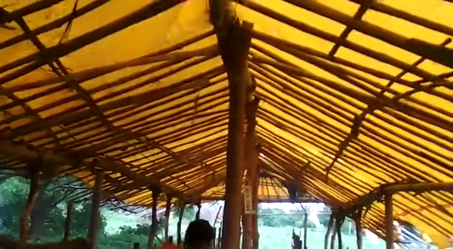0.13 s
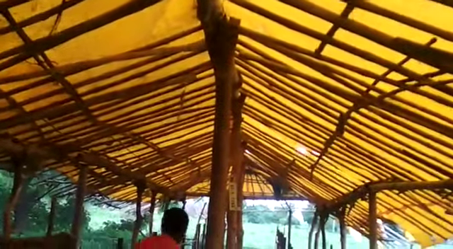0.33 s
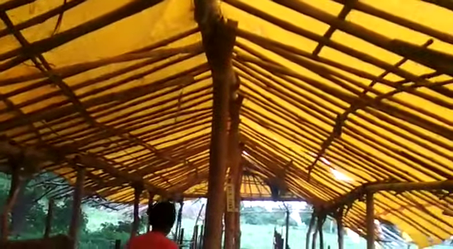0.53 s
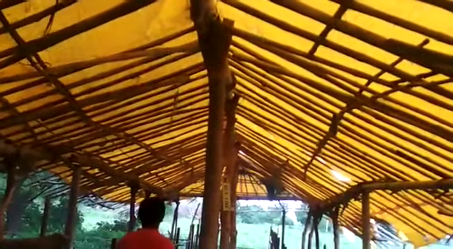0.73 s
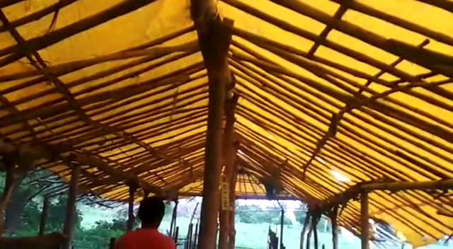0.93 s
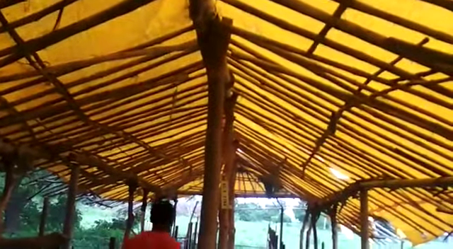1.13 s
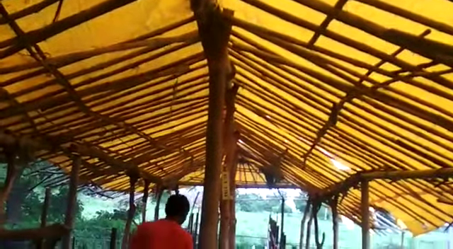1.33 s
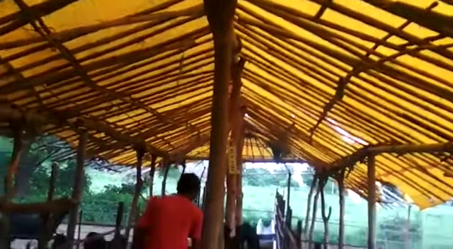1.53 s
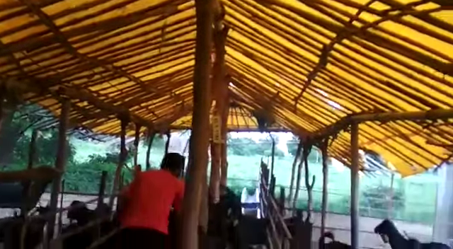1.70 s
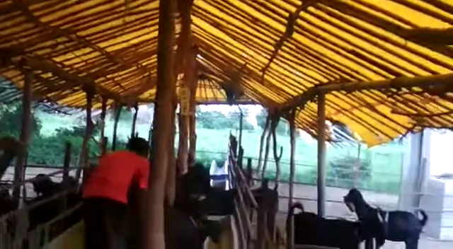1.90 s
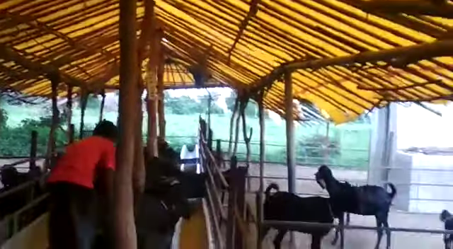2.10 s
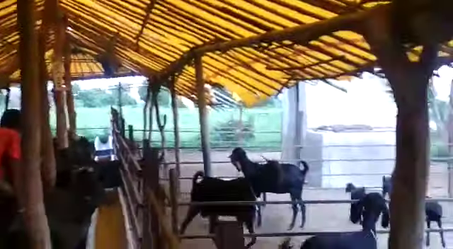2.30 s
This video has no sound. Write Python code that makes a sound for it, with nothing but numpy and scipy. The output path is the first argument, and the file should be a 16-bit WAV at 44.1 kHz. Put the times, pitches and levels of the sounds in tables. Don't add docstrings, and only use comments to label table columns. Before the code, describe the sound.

Wooden bangs from hooves and horns come at once, clustered at 0-0.4 s, with woody thuds and bright cracks. A lull at 0.45-0.8 s holds soft straw scuffs and ticks. Knocks return at 0.83 and 1.13-1.2 s. A far, thin, quavering kid bleat runs 1.42-1.88 s, ending with a tiny squeak. Hard bangs follow at 2.03-2.1 s, then fade. Wind rumbles on the right; the herd shuffles faintly.

```python
import sys
import numpy as np
from scipy import signal
from scipy.fft import rfft, irfft, next_fast_len
from scipy.io import wavfile
from scipy.ndimage import uniform_filter1d, map_coordinates

SR = 44100
rng = np.random.default_rng(int(sys.argv[2]) if len(sys.argv) > 2 else 0)


def transcribe(u):
    v = np.clip(np.atleast_2d(u).T, -1, 1)
    q = np.round(v * 32767).astype(np.int16)
    wavfile.write(sys.argv[1], SR, q)


def undo_db(level):
    steps = np.asarray(level, float) / 20
    return 10 ** steps


N = 108133
TIME = np.arange(N) / SR


def unit(x):
    return x / np.sqrt(np.mean(x ** 2) + 1e-20)


def along(points, hz):
    f, v = np.transpose(points)
    return np.interp(np.log(hz + 1), np.log(f + 1), v)


def coloured(points):
    return lambda hz: undo_db(along(points, hz))


def wobble(rate_hz):
    return map_coordinates(rng.standard_normal(int(N * 400 / SR)), [TIME * rate_hz])


def filtered(x, response):
    m = next_fast_len(N + 8192)
    return irfft(rfft(x, m) * response(np.fft.rfftfreq(m, 1 / SR)), m)[..., :N]


def resonances(peaks):
    def response(f):
        total = 0
        for k, (centre, spread, db) in enumerate(peaks):
            ring = 1j * f * spread / (centre ** 2 - f ** 2 + 1j * f * spread)
            total = total + (-1) ** k * undo_db(db) * ring
        return total
    return response


def rush(response):
    # pitch_hz, likeness (0 to 1)
    likeness = [(60, 0.61), (180, 1), (550, 0.85), (1650, 0.074), (4970, 0.0), (15000, 0.21)]
    # pitch_hz, level_db
    lean = [(180, 0.5), (550, -1.5), (1400, 4), (2600, -1.5), (6000, 0.5), (14000, 0.5)]
    left_lag_s = 4e-5

    def spread(hz):
        turn = np.arccos(np.clip(along(likeness, hz), -1, 1)) / 2
        return response(hz) * np.array([np.cos(turn), np.sin(turn)])

    def ports(hz):
        balance = undo_db(np.outer([.5, -.5], along(lean, hz)))
        return balance * np.exp(np.outer([-1j, 1j], np.pi * hz * left_lag_s))

    mid, side = filtered(rng.standard_normal((2, N)), spread)
    return unit(filtered(np.array([mid + side, mid - side]), ports))


def blow(s, t60, rise_s):
    t = np.maximum(TIME - s, 0)
    sag_db_per_s2 = 679
    return (1 - np.exp(-t / rise_s)) * undo_db(-60 * t / t60 - sag_db_per_s2 * t * t)


def patchy(x):
    z = signal.stft(x, nperseg=256)[2]
    patches = rng.standard_normal(z.shape[1:])
    patches = uniform_filter1d(patches, size=3, axis=0)
    patches = uniform_filter1d(patches, size=8, axis=1)
    patch_db = 2.5 * unit(patches)
    return unit(signal.istft(z * undo_db(patch_db), nperseg=256)[1][:, :N])


def yard():
    # time_s, level_db
    yard_swell = [(0, -59.5), (.45, -69.5), (.55, -72), (.75, -68), (1.05, -69), (1.3, -60), (1.41, -69),
                  (1.45, -74), (1.85, -82), (1.98, -71), (2.3, -64), (2.45, -71.5)]
    # pitch_hz, level_db
    yard_colour = [(2500, -33), (5000, -6.5), (7500, -4.5), (8400, -10), (10000, -6.5), (15500, 1)]
    return undo_db(np.interp(TIME, *np.transpose(yard_swell))) * rush(coloured(yard_colour))


def herd():
    # time_s, level_db
    shuffling = [(0, -73), (.45, -67), (.7, -62), (.8, -67), (1.08, -67.5), (1.3, -64.5), (1.42, -67.5),
                 (1.68, -66), (1.95, -56.5), (2.3, -62.5), (2.45, -66.5)]
    # pitch_hz, level_db (per Hz)
    air_colour = [(100, -14.5), (200, -21.5), (340, -25), (1400, -27), (2000, -30.5), (4500, -38.5),
                  (7500, -46.5), (8400, -49)]
    return undo_db(np.interp(TIME, *np.transpose(shuffling)) + wobble(11.3)) * rush(coloured(air_colour))


def wind():
    # time_s, level_db
    gusts = [(0, -40), (.07, -41.5), (.13, -38.5), (0.298, -44.5), (.6, -57), (0.631, -43.5), (0.779, -59),
             (0.818, -43), (0.989, -42), (1.082, -59), (1.242, -63), (1.271, -42), (1.38, -66), (1.69, -72),
             (1.73, -42.5), (1.84, -41), (1.98, -46.5), (2.24, -41), (2.324, -55)]
    # pitch_hz, level_db (per Hz)
    rumble = [(9, -23), (15, 9.5), (38, -2.5), (97, -10.5), (140, -16), (200, -22.5), (300, -35.5),
              (600, -100)]
    # time_s, pressure_db, sign_and_size (no unit), width_s
    slaps = [
        (0.031, -18.5, -1.26, 0.0057),
        (0.207, -26, 1, 0.0071),
        (0.966, -10, -0.39, 0.0065),
        (1.913, -13.5, 0.81, 0.0034),
        (0.639, -31, -1.1, 0.0071),
        (1.746, -26, 1, 0.0053),
        (1.762, -18, 0.41, 0.0053),
        (2.201, -29, 0.67, 0.014),
    ]
    puffs_s = [.22, .43, .76, 1.0, 1.23, 1.345, 1.42, 1.53, 1.585, 1.88, 2.0, 2.26, 2.39]
    puff_width_s = 0.0077
    lee, face = filtered(rng.standard_normal((2, N)), coloured(rumble))
    gust_db = np.interp(TIME, *np.transpose(gusts)) + 6.5
    face = unit(face * undo_db(1.5 * wobble(12.02))) * undo_db(gust_db)
    puffs = sum(np.exp(-((TIME - at) / puff_width_s) ** 2) for at in puffs_s)
    lee = unit(lee * (0.14 + puffs)) * undo_db(-57)
    slap = np.zeros(N)
    for s, db, sign, width_s in slaps:
        u = (TIME - s) / width_s
        slap += sign * undo_db(db) * (1 - .5 * u) * np.exp(-u * u)
    return np.array([lee, face + filtered(slap, lambda f: 1j * f / (18 + 1j * f))])


def straw():
    # start_s, length_s, level_db
    scuffs = [
        (0.483, 0.11, -65.5),
        (0.513, 0.3, -65),
        (0.995, 0.093, -70.5),
        (1.681, 0.25, -88),
    ]
    # pitch_hz, level_db
    straw_colour = [(2000, -11), (3500, 1.5), (5500, 5), (7500, 5.5), (8300, 3.5), (10000, 0), (12000, -6),
                    (16000, -25)]
    stroke = np.zeros(N)
    for s, length_s, db in scuffs:
        stroke += undo_db(db) * np.sin(np.pi * np.clip((TIME - s) / length_s, 0, 1)) ** 1.2
    grain_db = 1.5 * wobble(25) + 2.5 * wobble(250)
    return stroke * undo_db(grain_db) * rush(coloured(straw_colour))


def closing_squeak():
    # start_s, length_s, from_hz, to_hz, level_db
    squeak = (1.842, .056, 1570, 1390, -50)
    s, length_s, from_hz, to_hz, db = squeak
    u = np.clip((TIME - s) / length_s, 0, 1)
    turns = np.cumsum(from_hz + (to_hz - from_hz) * u) / SR
    return undo_db(db) * np.sin(np.pi * u) * np.sin(2 * np.pi * turns)


def rasp():
    # pitch_hz, level_db
    nose_colour = [(8800, -45), (9500, 2), (11900, 4), (12200, -53.5), (16000, -55)]
    nose_s = (1.42, 1.45, 1.9, 2.0)
    # pitch_hz, level_db
    wheeze_colour = [(5200, -42), (6300, -5), (7600, -7), (9200, -8), (9800, -30)]
    wheeze_s = (1.45, 1.52, 1.77, 1.81)
    nose_db = -65 + np.interp(TIME, nose_s, [-2, -1, 0.5, -14], -60, -60) + 1.3 * wobble(30.8)
    wheeze_db = -65.5 + np.interp(TIME, wheeze_s, [-17, 4, -3, -35], -60, -60) + 2.5 * wobble(24.5)
    return undo_db(nose_db) * rush(coloured(nose_colour)) + undo_db(wheeze_db) * rush(coloured(wheeze_colour))


def kid():
    # time_s, pitch_hz, level_db
    bleat = [
        (1.422, 522, -82),
        (1.44, 524, -67),
        (1.52, 535, -63),
        (1.6, 548, -63),
        (1.65, 564, -62),
        (1.75, 572, -61),
        (1.815, 572, -63),
        (1.84, 535, -68),
        (1.88, 490, -84),
    ]
    # pitch_hz, width_hz, level_db
    throat = [(545, 250, -26), (1140, 140, -2), (1680, 180, 2), (6950, 500, 9)]
    # pitch_hz, width_hz, level_db
    mouth = [(4870, 520, -26)]
    mouth_opens_s = (1.55, 1.62)
    s, hz, db = np.transpose(bleat)
    tremble_from_s, tremble_hz = 1.448, 11.7
    since = np.maximum(TIME - tremble_from_s, 0)
    shake = np.cos(2 * np.pi * tremble_hz * (TIME - tremble_from_s))
    quaver = 0.04 * np.exp(-since / 0.25) * shake
    jitter = 0.004 * (wobble(25) + wobble(110))
    turns = np.cumsum(np.interp(TIME, s, hz) * (1 + quaver + jitter)) / SR
    pulses = np.zeros(N)
    for k in range(1, 22):
        pulses += undo_db((2 + .15 * k) * wobble(22)) * np.cos(2 * np.pi * k * turns)
    breath = unit((1 + np.cos(2 * np.pi * turns)) * rng.standard_normal(N))
    folds = 0.85 * unit(pulses) + 0.15 * breath
    opening = np.interp(TIME, mouth_opens_s, [0, 1])
    voice = unit(filtered(folds, resonances(throat)) + filtered(folds * opening, resonances(mouth)))
    voice = voice * undo_db(np.interp(TIME, s, db, -120, -120) + 3 * shake)
    tail = rng.standard_normal((2, SR // 5)) * undo_db(-60 * TIME[:SR // 5] / 0.3)
    echo = signal.fftconvolve(voice[None], tail / np.linalg.norm(tail[0]), axes=1)[:, :N]
    return 1.3 * voice + 0.95 * echo


def ticks():
    # time_s, level_db, fade_s (by 60 dB), left_over_right_db, lowest_hz, highest_hz
    snaps = [(0.417, -66.5, 0.091, 29, 11900, 16200), (.486, -66.5, 0.05, 12, 5500, 9000),
             (.503, -62.5, 0.13, 3, 10000, 15500), (.577, -62, .06, 11, 3300, 4800),
             (0.947, -44, 0.22, -0.5, 3030, 11900), (1.592, -59, 0.069, 0.5, 8000, 12000),
             (1.735, -55, .08, 0.5, 7000, 12000), (2.297, -66.5, 0.13, -20, 11800, 15700),
             (0.017, -44.5, 0.073, 4, 2200, 15200), (0.838, -34, 0.061, 1, 3000, 16000),
             (2.099, -31.5, .08, 0, 4960, 15300)]
    total = np.zeros((2, N))
    for s, db, t60, side_db, low_hz, high_hz in snaps:
        noise = rush(lambda f: (f / low_hz) ** 8 / (1 + (f / low_hz) ** 8) / (1 + (f / high_hz) ** 8))
        sides = undo_db(db + np.array([[side_db / 2], [-side_db / 2]]))
        total += sides * blow(s, t60, 0.00067) * noise
    return total


def thuds():
    contacts_s = [.011, .015, .179, .356, .538, .89, 1.19, 1.884, 2.028, 2.104, 2.18, 2.272, 2.392, .5,
                  1.752, 1.8, .836, .19, .262]
    # level_db, pitch_hz, fade_s (by 60 dB)
    boards = [(-43.5, 188.5, 0.48), (-33, 1630, 0.13), (-37, 380, 0.29), (-34.5, 1200, 0.15),
              (-50.5, 267, 0.17), (-40, 424, 0.26), (-38, 344, 0.46), (-49.5, 420, 0.083),
              (-37.5, 177, 0.29), (-30, 360, 0.38), (-42, 250, 0.35), (-50, 440, 0.28), (-46, 180, 0.22),
              (-60, 1260, 1), (-50.5, 1270, 0.13), (-60, 1260, 0.076), (-34, 1240, 0.26), (-40, 420, 0.18),
              (-43, 1600, 0.14)]
    shake = rush(np.ones_like)
    total = np.zeros((2, N))
    for s, (db, hz, t60) in zip(contacts_s, boards):
        board = resonances([(hz, .45 * hz, 0)])
        ringing = unit(filtered(shake, lambda f: board(f) ** 2))
        total += undo_db(db) * blow(s, t60, 0.003) * ringing
    return total


def planks():
    # time_s, body_db, crack_db, fade_s (by 60 dB), rise_s
    bangs = [(0, -39, -36, 0.26, 0.0038), (0.011, -29, -30.5, 0.34, 0.00049),
             (0.17, -40, -36.5, 0.2, 0.0029), (0.175, -27.5, -34, 0.35, 0.0014),
             (0.243, -30.5, -36, 0.4, 0.016), (0.352, -38.5, -80, 0.44, 0.001),
             (0.497, -65, -86, 0.89, 0.0077), (0.553, -51, -47.5, 0.31, 0.052),
             (0.651, -56, -58.5, 0.27, 0.0065), (0.834, -44.5, -34.5, 0.54, 0.0011),
             (0.871, -33, -64, 0.37, 0.0049), (1.126, -29.5, -34.5, 0.74, 0.0045),
             (1.146, -33.5, -54, 0.44, 0.021), (1.176, -25.5, -38.5, 0.31, 0.01),
             (1.713, -59.5, -54.5, 0.37, 0.0074), (1.74, -52.5, -51.5, 0.15, 0.0061),
             (1.796, -50.5, -66, 0.27, 0.0049), (1.858, -42, -55, 0.12, 0.0011),
             (1.874, -52, -60, 1, 0.0013), (2.013, -39.5, -78, 0.42, 0.011),
             (2.025, -29, -34, 0.45, 0.0072), (2.098, -30, -33.5, 0.59, 0.001),
             (2.266, -53, -80, 0.38, 0.0032), (0.262, -40, -50, 0.12, 0.0035),
             (1.185, -31, -57, 0.11, 0.0016), (1.921, -48, -70, .2, .004),
             (2.055, -33.5, -46, 0.17, 0.0022), (2.443, -60, -60.5, 0.18, 0.0038)]
    # pitch_hz, level_db (per Hz)
    body_colour = [(70, -53), (120, -14.5), (290, -4), (720, -1), (1100, -0.5), (1750, -6), (2300, -18),
                   (5000, -42)]
    # pitch_hz, level_db
    crack_colour = [(1000, -3), (2500, 2), (4000, 2), (6000, -4), (10000, -2.5), (13000, -5.5), (15600, -6),
                    (16500, -30)]
    # pitch_hz, level_db
    far_colour = [(1000, -3), (3000, -1), (7300, -2), (8200, -29), (9800, -16), (12000, -16), (13000, -35)]
    # from_s, to_s
    far_spans = [(.45, .8), (1.6, 1.95)]
    body = patchy(rush(coloured(body_colour)))
    crack = patchy(rush(coloured(crack_colour)))
    dull = patchy(rush(coloured(far_colour)))
    low_power, high_power = np.zeros(N), np.zeros(N)
    for s, body_db, crack_db, t60, rise_s in bangs:
        low_power += (undo_db(body_db) * blow(s, t60, rise_s)) ** 2
        high_power += (undo_db(crack_db) * blow(s, 0.8 * t60, rise_s)) ** 2
    far = sum((TIME > a) & (TIME < b) for a, b in far_spans)
    rattle = unit(undo_db(1.25 * wobble(300)) * np.where(far, dull, crack))
    return np.sqrt(low_power) * body + np.sqrt(high_power) * rattle


def scene():
    background = yard() + herd() + wind()
    animals = straw() + closing_squeak() + rasp() + kid()
    return background + animals + ticks() + thuds() + planks()


def band_limit(x):
    return signal.sosfilt(signal.butter(12, 16620, fs=SR, output="sos"), x)


def record(dry):
    # pitch_hz, level_db (per bin)
    knee = [(150, -101), (1000, -78), (15000, -102)]
    hz, _, z = signal.stft(dry, SR, nperseg=512)
    power = uniform_filter1d(np.abs(z) ** 2, size=2, axis=1)
    power = np.abs(uniform_filter1d(power, size=5, axis=2)).mean(0)
    gain = (power / (power + undo_db(2 * along(knee, hz))[:, None])) ** 0.52
    x = signal.istft(z * gain, SR, nperseg=512)[1][:, :N]
    ceiling, top_hz = 0.15, 16300
    x = x / (1 + np.abs(x / ceiling) ** 4) ** .25
    return band_limit(filtered(x, lambda f: f < top_hz))


dry = scene()
out = record(dry)
transcribe(out)
```